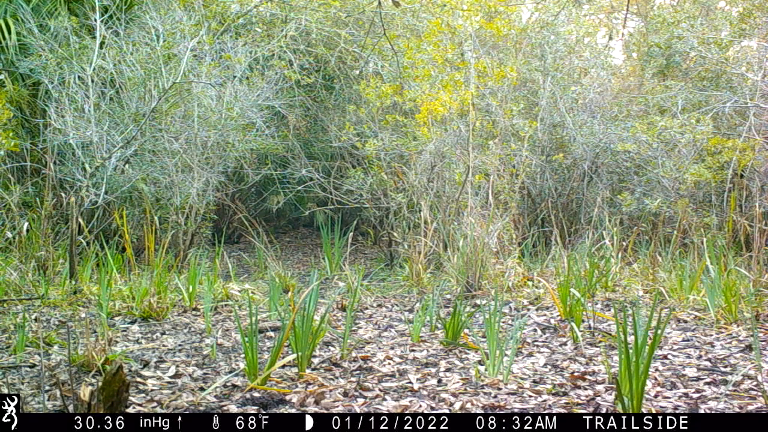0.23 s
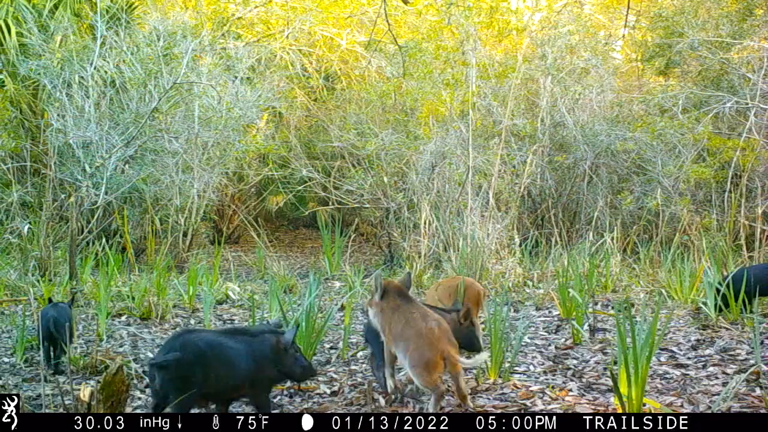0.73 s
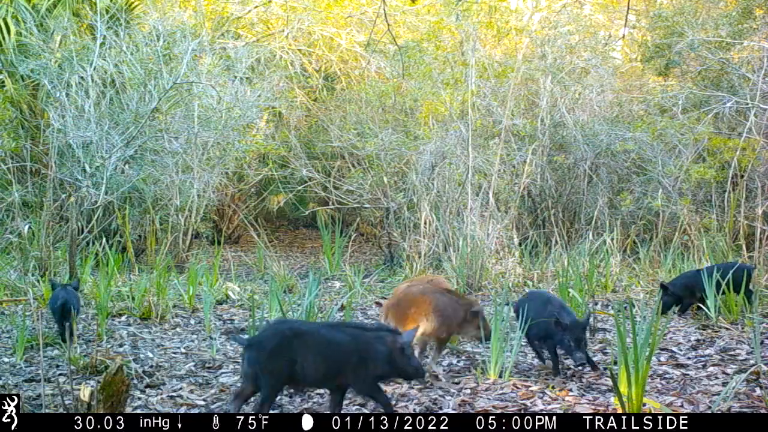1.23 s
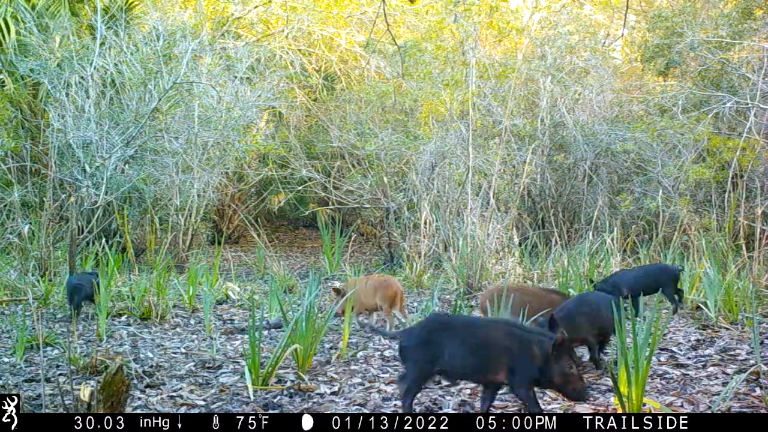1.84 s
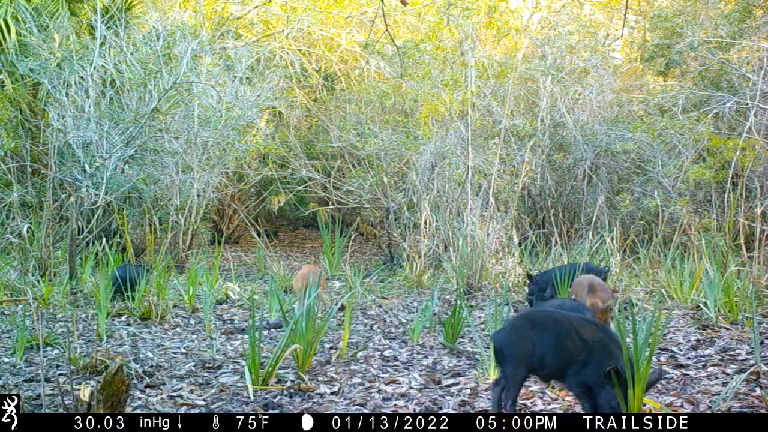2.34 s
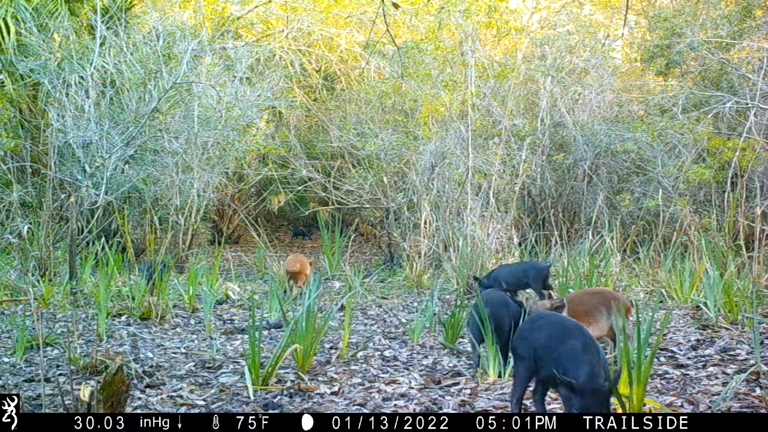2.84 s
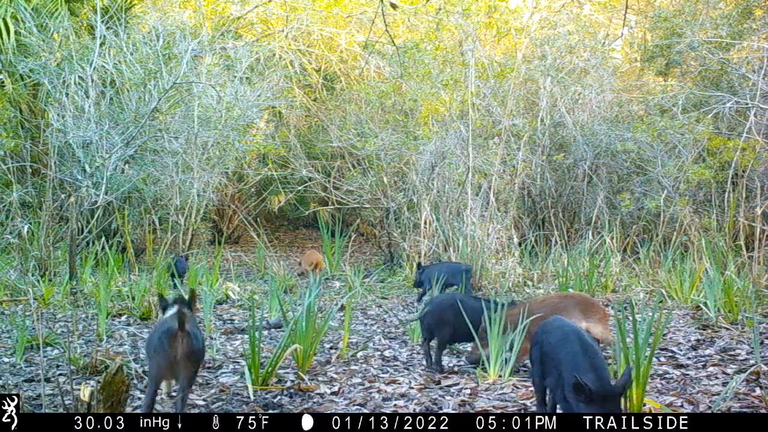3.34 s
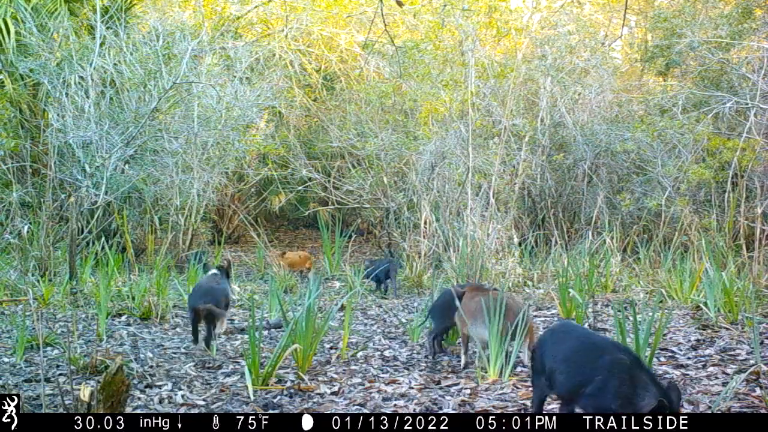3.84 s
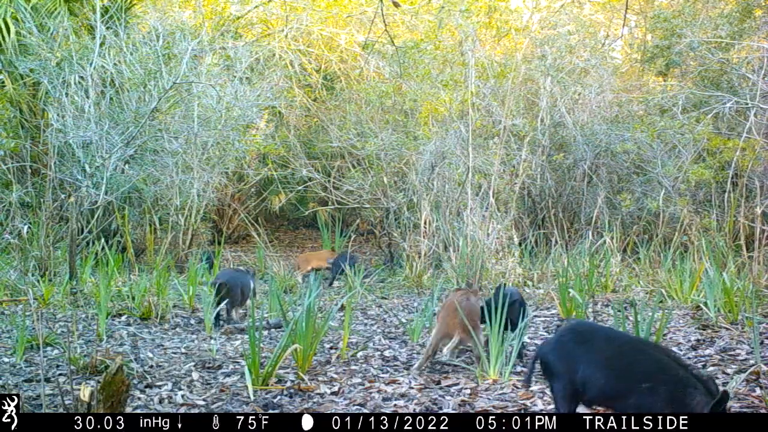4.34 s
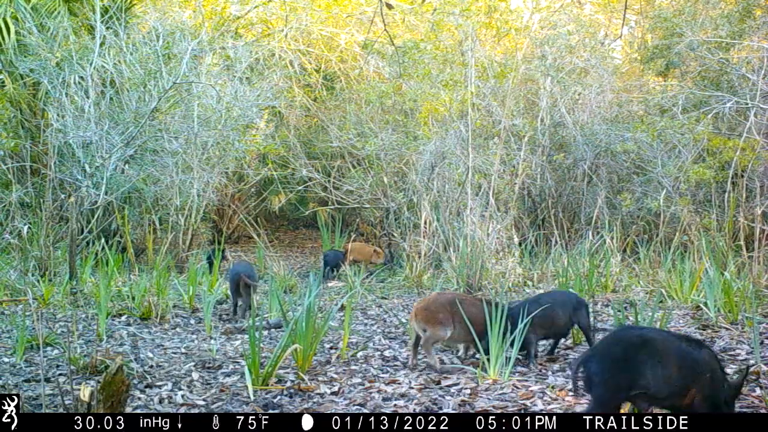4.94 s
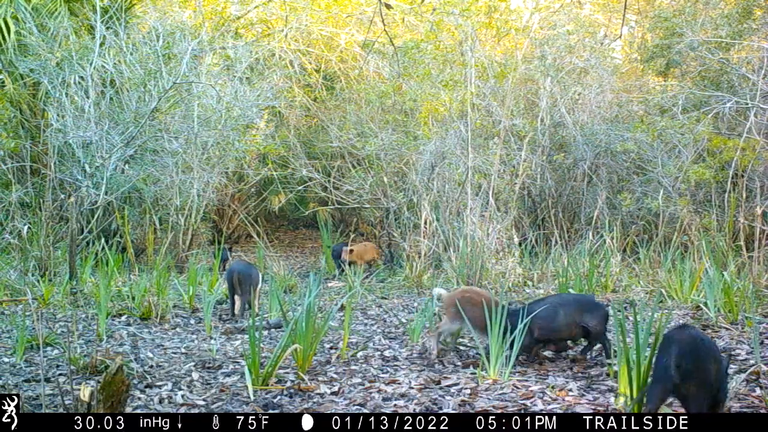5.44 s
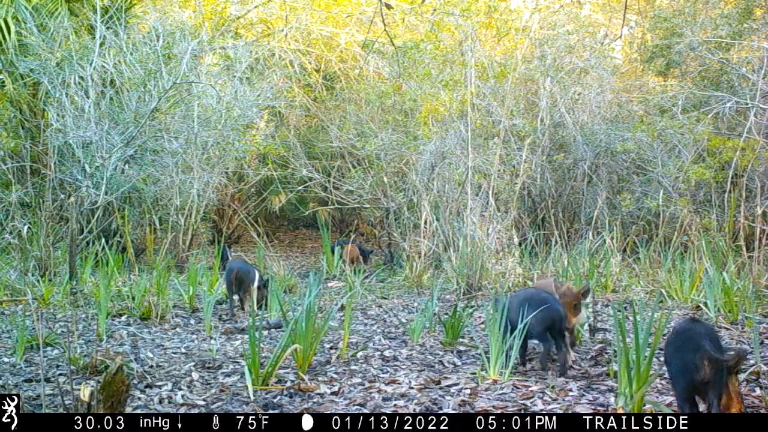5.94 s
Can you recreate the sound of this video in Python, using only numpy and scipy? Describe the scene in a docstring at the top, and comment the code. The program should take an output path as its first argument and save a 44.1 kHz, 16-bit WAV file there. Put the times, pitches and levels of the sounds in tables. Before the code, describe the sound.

Dry leaves crackle and rustle from the start as wild hogs walk and forage on a forest floor, and one briefly gives a low, quiet grunt. Twigs snap and hooves knock on sticks among the crunching steps, which get busier, ease off, then return more lightly near the end. The sound is mono and a little tinny, from one outdoor microphone, with slight scatter from the brush and a faint constant hiss.

```python
"""Wild hogs trot and root through dry leaf litter, heard from a trail camera over a faint steady hiss.
From the start the herd rustles, and each near hoof or snout crushes a burst of crackling leaves.
Leaf ribs and twigs soon snap and struck sticks ring; at 0.2 s one hog gives a short low grunt.
The steps thin out near 4 s and pick up again after 5 s. Throughout, brush and trunks scatter the sound,
and the plastic case around the single microphone resonates near 4 kHz."""
import sys
import numpy as np
from scipy import signal
from scipy.io import wavfile
from scipy.ndimage import uniform_filter1d

SR = 44100
rng = np.random.default_rng(int(sys.argv[2]) if len(sys.argv) > 2 else 0)


def file_out(sig):
    """Save sig as 16-bit WAV at sys.argv[1]."""
    # one column per channel
    cols = np.atleast_2d(sig).T
    # limit, then scale
    lim = np.clip(cols, -1, 1)
    pcm = np.round(lim * 32767).astype(np.int16)
    wavfile.write(sys.argv[1], SR, pcm)


N = 273420
TIME = np.arange(N) / SR


def amp(db):
    """Amplitude ratio of a level in decibels."""
    return 10 ** (np.asarray(db) / 20)


def unit_rms(x):
    """Normalisation to a mean power of 1."""
    return x / np.sqrt(np.mean(x ** 2) + 1e-20)


def steadied(x, size=2200):
    """Running normalisation: power stays near 1 over size samples, leaving the fine crackle."""
    return x / np.sqrt(abs(uniform_filter1d(x ** 2, size)) + 1e-12)


def add(mix, start_s, sound):
    """Superposition of a sound on the mix."""
    part = mix[max(round(start_s * SR), 0):][:len(sound)]
    part += sound[:len(part)]


def colour(x, spectrum, size=4096):
    """Minimum-phase filtering at unit energy: clicks take on the spectrum and keep their sharp fronts."""
    hz, db = np.transpose(spectrum)
    log_hz = np.log(abs(np.fft.fftfreq(size, 1 / SR)) + 1)
    log_gain = np.log(amp(np.interp(log_hz, np.log(hz), db)))
    response = np.fft.ifft(np.exp(np.conj(signal.hilbert(log_gain)))).real[:size // 2]
    return signal.oaconvolve(x, response / np.linalg.norm(response))[:len(x)]


def band(x, hz, spread, order=2):
    """Band-pass filtering from hz / spread to hz * spread."""
    sos = signal.butter(order, [hz / spread, hz * spread], "band", fs=SR, output="sos")
    return signal.sosfilt(sos, x)


def wander(per_s):
    """Random modulation of rms 1, gliding to a new value per_s times a second."""
    return unit_rms(np.interp(TIME * per_s, np.arange(N), rng.standard_normal(N)))


def loose_times(per_s, count=80):
    """Stratified timing: one random moment in each 1 / per_s seconds, with two draws from -1 to 1."""
    place, a, b = rng.random((count, 3)).T
    rows = np.transpose([(np.arange(count) + place) / per_s, 2 * a - 1, 2 * b - 1])
    return rows[rows[:, 0] < TIME[-1] - .02]


def fractures(per_s, spread_db, clump_db, ring_s, count=512, size=300):
    """Shot noise: tiny random breaks, louder in clumps, each excite one leaf's brief decaying ring."""
    unevenness = np.minimum(rng.exponential(1, N), 3)
    strength = amp(spread_db * unevenness + clump_db * np.tanh(wander(170)))
    leaf, t = rng.integers(0, count, N), np.arange(size) / SR
    decay_s = ring_s * np.geomspace(.5, 2, count)[:, None]
    rings = rng.standard_normal((count, size)) * np.exp(-t / decay_s)
    rings /= np.linalg.norm(rings, axis=1, keepdims=True)
    onsets = np.flatnonzero(rng.random(N) < per_s / SR)
    samples = onsets[:, None] + np.arange(size)
    breaks = strength[onsets, None] * rings[leaf[onsets]]
    return np.bincount(samples.ravel(), breaks.ravel(), N)[:N]


# Spectrum of the distant rustle, heard through the case: f/Hz, relative level/dB
HERD_SPECTRUM = [(50, -31), (250, -22), (850, -9), (1250, -9), (1750, -3.5), (2800, -6.5), (3750, -2.5),
                 (4200, 4), (5500, -9.5), (6400, -8.5), (7100, -24.5), (7800, -39), (8600, -18),
                 (10300, -47.5)]
# Envelope of the herd's shuffling: t/s, level/dB
HERD_LEVELS = [(0, -31), (0.28, -36.5), (0.39, -44), (0.7, -40), (0.88, -32), (1.3, -32), (1.63, -36),
               (1.78, -29), (1.93, -35), (2.29, -31), (2.98, -30), (3.32, -36), (3.5, -33), (3.88, -37),
               (4.88, -39.5), (5.06, -37), (6.02, -38.5), (6.15, -46.5)]


def herd_rustle(flutter_db=1.52):
    """Incoherent summation: many small feet further off blend into one uneven rustle."""
    rustle = steadied(colour(fractures(3500, 2.6, 1.9, 0.00068), HERD_SPECTRUM))
    return rustle * amp(herd_db(TIME) + flutter_db * wander(35))


def herd_db(s):
    """Linear interpolation of the herd's level at time s."""
    return np.interp(s, *np.transpose(HERD_LEVELS))


# Spectra of thin leaves, thick leaves and packed litter, through the case: f/Hz, relative level/dB
CRACKLE_SPECTRUM = [(40, -27.5), (250, -21.5), (800, -17.5), (1800, -11.5), (2900, -8), (3550, -3.5),
                    (3800, -6), (4200, 2), (5500, -12.5), (6400, -9.5), (7100, -30), (7800, -32.5),
                    (8600, -20), (10300, -54)]
CRUNCH_SPECTRUM = [(200, -2), (1000, 5), (1300, -1.5), (2000, -3), (2700, -5), (3450, -2.5), (3750, 6.5),
                   (4200, -4), (5000, -3), (7000, -13), (10300, -31.5)]
LITTER_SPECTRUM = [(25, -2), (60, 0), (1200, -0.5), (3000, -6.5), (6000, -13), (7500, -14), (9300, -12),
                   (10300, -39)]
# Near hoof falls and snout pushes: t/s, duration/s, crackle level/dB, crunch f/Hz
FOOTFALLS = [(0.0, 0.078, -28, 2090), (0.097, 0.034, -36, 2300), (0.184, 0.05, -30.5, 2400),
             (0.288, 0.079, -34, 2320), (0.455, 0.047, -31.5, 2260), (0.546, 0.091, -32.5, 2090),
             (0.787, 0.028, -29, 2020), (0.837, 0.03, -29, 1900), (0.884, 0.053, -28, 1300),
             (0.966, 0.045, -28.5, 1590), (1.152, 0.125, -26.5, 1100), (1.177, 0.048, -31.5, 2400),
             (1.373, 0.021, -36, 1000), (1.497, 0.05, -35.5, 1250), (1.572, 0.027, -37, 1500),
             (1.666, 0.045, -31, 2490), (1.758, 0.049, -27.5, 2320), (1.807, 0.058, -27.5, 1330),
             (1.994, 0.058, -31, 2400), (2.042, 0.084, -28.5, 2070), (2.195, 0.039, -30.5, 2580),
             (2.312, 0.064, -26.5, 2600), (2.435, 0.039, -28, 2530), (2.497, 0.033, -28, 2320),
             (2.582, 0.012, -29.5, 2220), (2.669, 0.078, -24.5, 1920), (2.746, 0.076, -24.5, 2300),
             (2.826, 0.052, -29, 2400), (2.874, 0.052, -25, 2100), (2.926, 0.12, -34.5, 2600),
             (3.107, 0.071, -29, 2220), (3.19, 0.053, -32.5, 2000), (3.239, 0.04, -29.5, 2240),
             (3.386, 0.017, -32.5, 2350), (3.439, 0.024, -30, 990), (3.515, 0.083, -36, 1200),
             (3.628, 0.042, -36, 895), (4.006, 0.026, -36.5, 2500), (4.506, 0.087, -40, 1300),
             (4.66, 0.055, -37, 1000), (5.021, 0.059, -31.5, 1900), (5.262, 0.035, -34.5, 950),
             (5.347, 0.02, -37, 1380), (5.398, 0.025, -34.5, 1510), (5.442, 0.034, -31.5, 1380),
             (5.503, 0.03, -35, 1820), (5.66, 0.046, -32, 1600), (5.718, 0.023, -33.5, 2400),
             (5.794, 0.037, -38, 1880), (5.955, 0.059, -39, 2200)]


def steps(rise_s=0.0018, release_s=0.0064, sag_db=1.5, arch_db=2):
    """Brittle fracture under load: thin leaves crackle, thick ones crunch, packed litter gives way."""
    crackle = steadied(colour(fractures(5500, 2.5, 0.89, 0.00074), CRACKLE_SPECTRUM), size=1100)
    crunch = colour(fractures(1800, 0.89, 2.2, .001), CRUNCH_SPECTRUM)
    litter = steadied(colour(fractures(2500, 3.26, 1.9, 0.00024), LITTER_SPECTRUM), size=1100)
    light_steps = [(s, 0.02 * 2 ** a, herd_db(s) - 3, 1280 * 2 ** (b / 2))
                   for s, a, b in loose_times(per_s=6)]
    out = np.zeros(N)
    for s, length, db, crunch_hz in FOOTFALLS + light_steps:
        crunch_db = db - 5.5 + 8 * np.log2(crunch_hz / 1990)  # drier leaves crunch higher and louder
        litter_db = -39 + 2.7 * (db + 28.5)  # heavier steps reach deeper, so the litter grows faster
        span = (TIME >= s) & (TIME < s + length + 5 * release_s)
        t = TIME[span] - s
        press = np.minimum(t / rise_s, 1) * np.exp(-np.maximum(t - length, 0) / release_s)
        press *= amp(-sag_db * t / length)  # fewer leaves are left to break as the hoof sinks
        weight = np.sin(np.pi * np.minimum(t / length, 1))  # peaks in mid-step
        press *= amp(arch_db * (weight - 2 / np.pi))
        thick = amp(crunch_db) * unit_rms(band(crunch[span], crunch_hz, spread=1.3))
        out[span] += press * (amp(db) * crackle[span] + thick + amp(litter_db) * litter[span])
    return out


# Spectrum of the background hiss: f/Hz, relative level/dB
HISS_SPECTRUM = [(30, -24.5), (100, -10), (240, -5), (400, -2.5), (850, 3.5), (1300, 0.5), (2800, -2.5),
                 (4250, 0), (5400, -10), (6400, -16), (7400, -29.5), (8600, -20), (10300, -47)]


def hiss(level_db=-42.5):
    """Stationary noise: a faint floor of constant spectrum and power."""
    return amp(level_db) * unit_rms(colour(rng.standard_normal(N), HISS_SPECTRUM))


# The loudest breaks of leaf ribs and small twigs: t/s, level/dB, duration/s
TWIG_BREAKS = [(0.252, -20.5, 0.001), (0.289, -27.5, 0.009), (0.32, -31, 0.0012), (0.5475, -28.5, 0.0038),
               (0.564, -27, 0.0048), (0.761, -21.5, 0.0012), (1.368, -23.5, 0.0027), (1.471, -26.5, 0.0019),
               (1.665, -24.5, 0.009), (1.9534, -22.5, 0.0007), (1.998, -29, 0.0053), (2.667, -28, 0.008),
               (2.995, -23, 0.001), (3.3887, -30, 0.0048), (4.094, -27, 0.001), (4.131, -27, 0.003),
               (4.343, -31.5, 0.0039), (4.628, -30.5, 0.0023), (5.2832, -34, 0.002), (5.359, -32, 0.0065),
               (5.406, -30.5, 0.0021), (5.612, -29.5, 0.0021), (5.639, -24.5, 0.0012),
               (6.007, -29.5, 0.0022)]


def snaps(release_s=0.00041, dull_db=-16, size=2000):
    """Sudden stress release: fibres tear in one burst, with a dull push on the litter below."""
    out, t = np.zeros(N), np.arange(size) / SR
    ticks = [(s, herd_db(s) + 1.5 + 2 * a, 0.0014 * 2 ** b) for s, a, b in loose_times(per_s=6)]
    for s, db, length in TWIG_BREAKS + ticks:
        tear = np.exp(-np.maximum(t - length, 0) / release_s)
        fibres = rng.standard_normal(size) * tear
        crack = colour(fibres, CRACKLE_SPECTRUM) + amp(dull_db) * colour(fibres, LITTER_SPECTRUM)
        add(out, s, amp(db) * crack * np.linalg.norm(tear) / np.linalg.norm(crack))
    return out


# Hooves and snouts striking sticks: t/s, level/dB, f/Hz
STICK_STRIKES = [(0.204, -18, 2080), (0.294, -14.5, 2020), (0.339, -19, 2200), (0.448, -30, 990),
                 (1.064, -19.5, 1640), (1.215, -13, 885), (1.239, -9, 1000), (1.631, -20, 1870),
                 (1.788, -18, 780), (2.125, -21.5, 840), (4.341, -27, 1080), (5.222, -24, 3400),
                 (5.454, -21.5, 1760), (5.796, -20.5, 4140)]


def knocks(t60=0.013, rise_s=0.00024, size=1500):
    """Damped free vibration: a struck stick rings in one mode, which the litter quickly absorbs."""
    out, t = np.zeros(N), np.arange(size) / SR
    for s, db, hz in STICK_STRIKES:
        envelope = amp(db - 60 * t / t60) * (1 - np.exp(-t / rise_s))
        add(out, s, envelope * np.sin(2 * np.pi * hz * t))
    return out


# Resonances of the hog's throat: f/Hz, bandwidth/Hz, relative level/dB
FORMANTS = [(256, 135, -6), (506, 100, -16.5)]


def grunt(start_s=0.212, length_s=0.128, level_db=-38, pulse_hz=83, jitter=0.093, rough=0.34,
          rise_s=0.014, release_s=0.0067):
    """Source and filter: slow uneven throat pulses, each with a rasp, excite two low formants."""
    span = (TIME >= start_s) & (TIME < start_s + length_s + 5 * release_s)
    t = TIME[span] - start_s
    cycles = np.cumsum(pulse_hz * (1 + jitter * wander(90)[span])) / SR
    pulses = np.diff(np.floor(cycles), prepend=-1)
    rasp = np.exp(-(cycles % 1) / 0.51) * rng.standard_normal(N)[span]  # fades within each cycle
    source = (1 - rough) * unit_rms(pulses) + rough * unit_rms(rasp)
    voice = sum(amp(db) * band(source, hz, 1 + width / hz / 2) for hz, width, db in FORMANTS)
    effort = np.minimum(t / rise_s, 1) * np.exp(-np.maximum(t - length_s, 0) / release_s)
    out = np.zeros(N)
    out[span] = amp(level_db) * effort * steadied(voice, size=900)
    return out


def thicket(x, t60=0.27, wet_db=-14, size=12000):
    """Scattering: brush and trunks return a faint tail of sparse, decaying echoes."""
    t = np.arange(size) / SR
    echoes = rng.standard_normal(size) * (rng.random(size) < 2000 / SR)
    echoes *= amp(-60 * t / t60) * (t > .006)
    return x + amp(wet_db) * signal.oaconvolve(x, echoes / np.linalg.norm(echoes))[:N]


# Modes of the plastic case: f/Hz, bandwidth/Hz, level/dB relative to the direct sound
CASE_MODES = [(3400, 230, -16), (4280, 230, -16.5)]


def case_ring(x, through_db=-0.5):
    """Forced resonance: the case passes the sound and adds its own narrow ring."""
    rings = sum(amp(db) * band(x, hz, 1 + width / hz / 2, order=1) for hz, width, db in CASE_MODES)
    return amp(through_db) * (x + rings)


def scene():
    """Superposition at one microphone: hogs and hiss, the same in both channels."""
    feet = thicket(steps() + herd_rustle() + snaps() + knocks())
    voice = thicket(grunt(), t60=0.99, wet_db=-11)  # low sound carries further among the trees
    mono = feet + voice + hiss()
    return np.array([mono, mono])


def record(dry, ceiling=0.38, cutoff_hz=10400):
    """Saturation and band limiting: after the case rings, peaks are rounded and the treble is cut."""
    rounded = ceiling * np.tanh(case_ring(dry) / ceiling)
    low_pass = signal.firwin(511, cutoff_hz, window=("kaiser", 9), fs=SR)
    return signal.oaconvolve(rounded, low_pass[None], "same", axes=1)


dry = scene()
out = record(dry)
file_out(out)
```